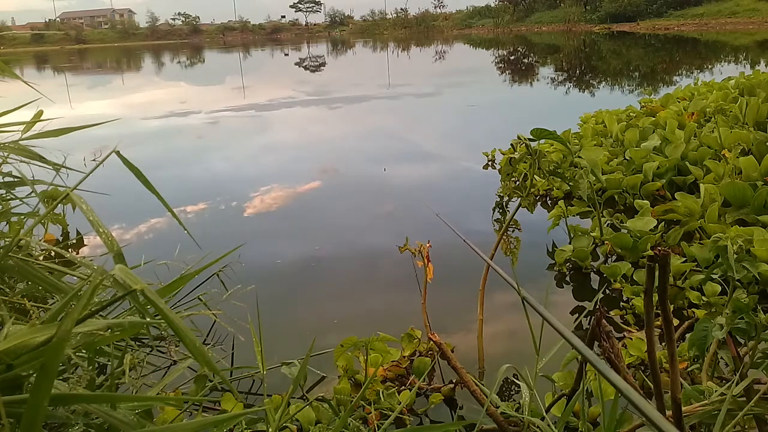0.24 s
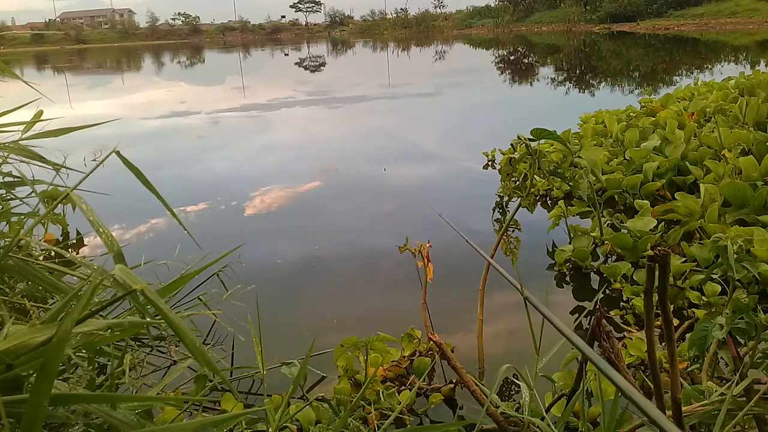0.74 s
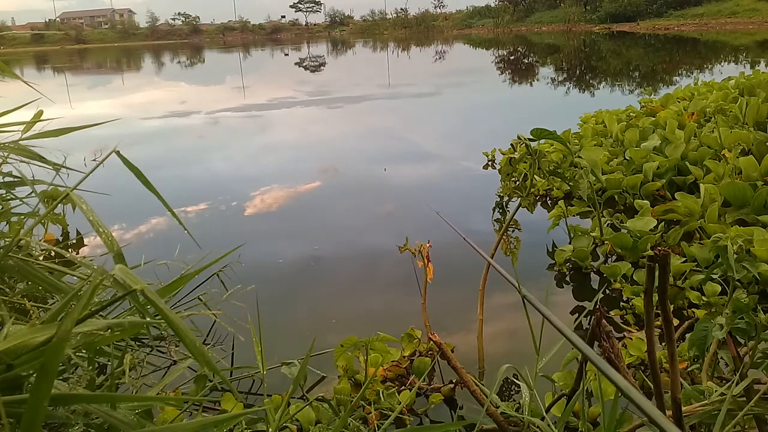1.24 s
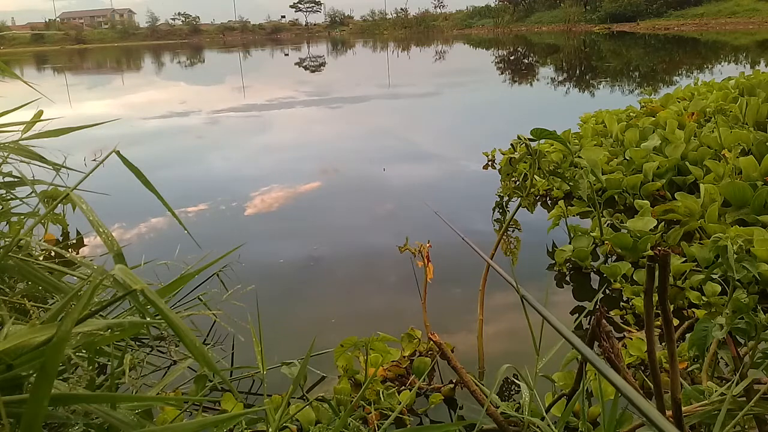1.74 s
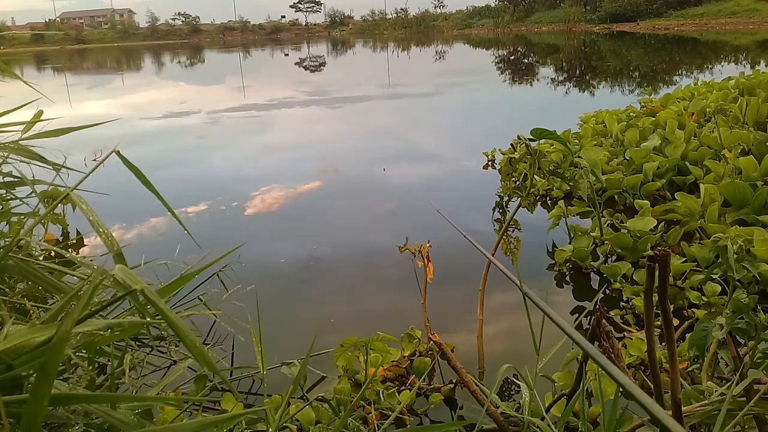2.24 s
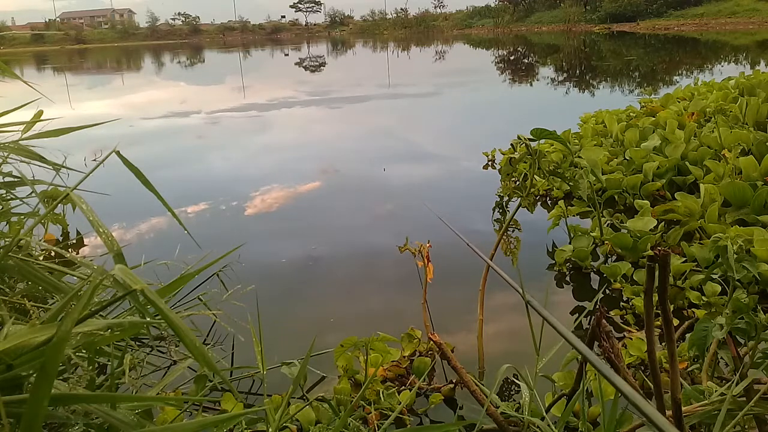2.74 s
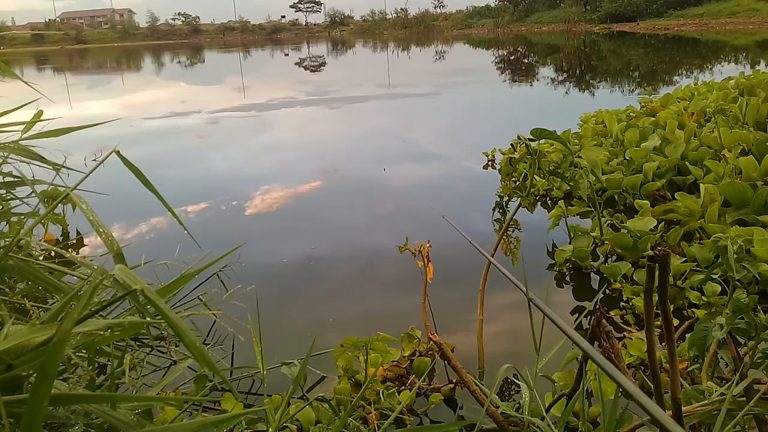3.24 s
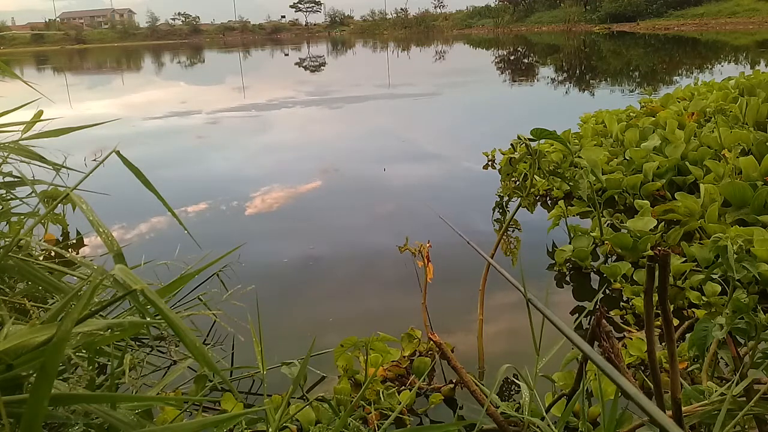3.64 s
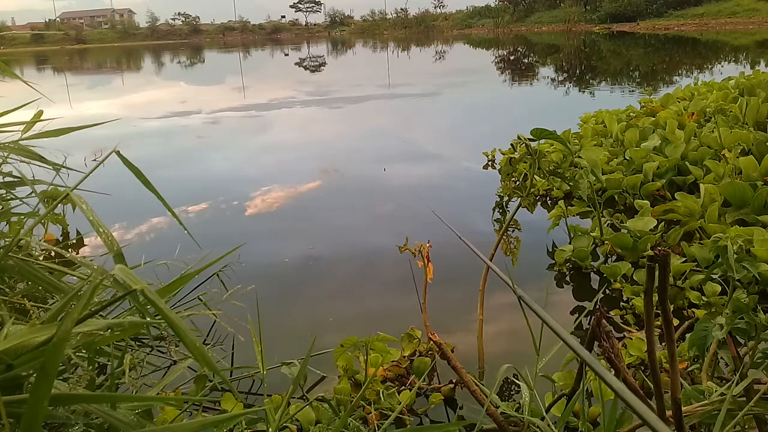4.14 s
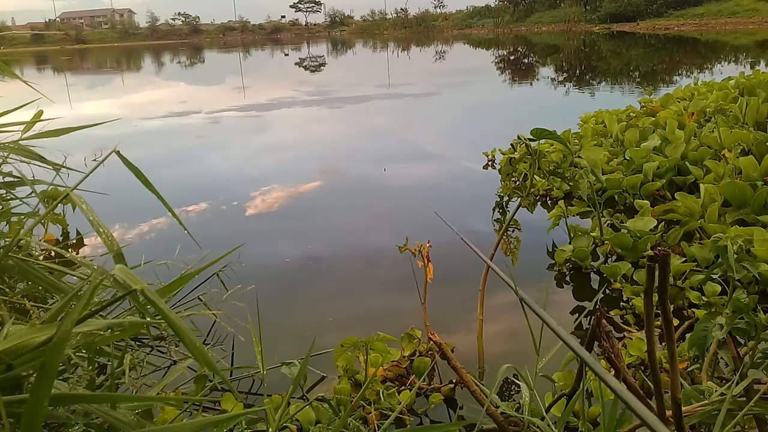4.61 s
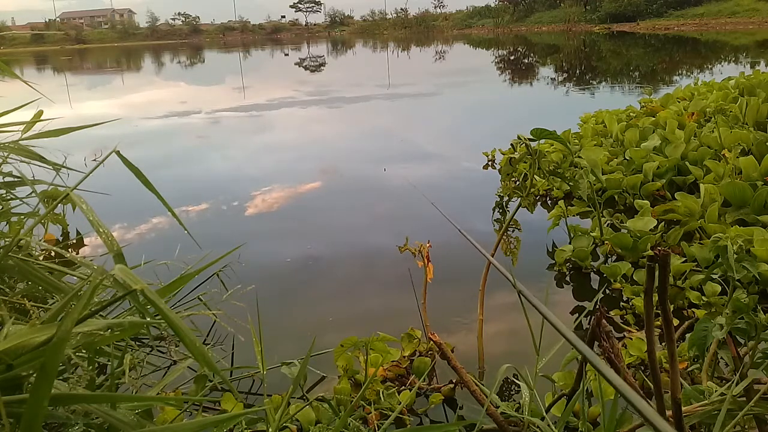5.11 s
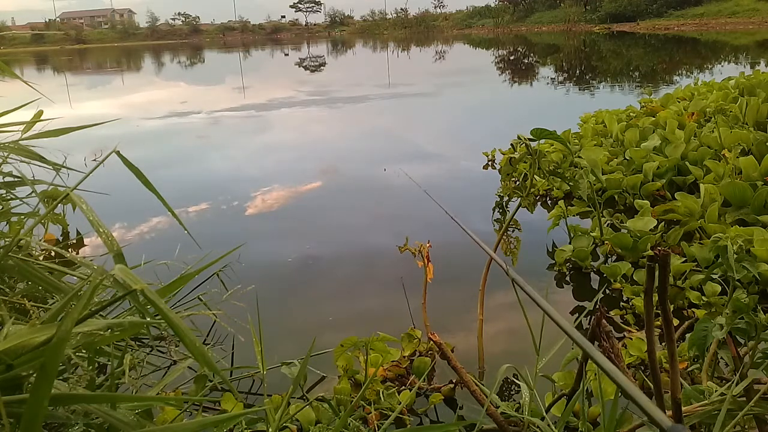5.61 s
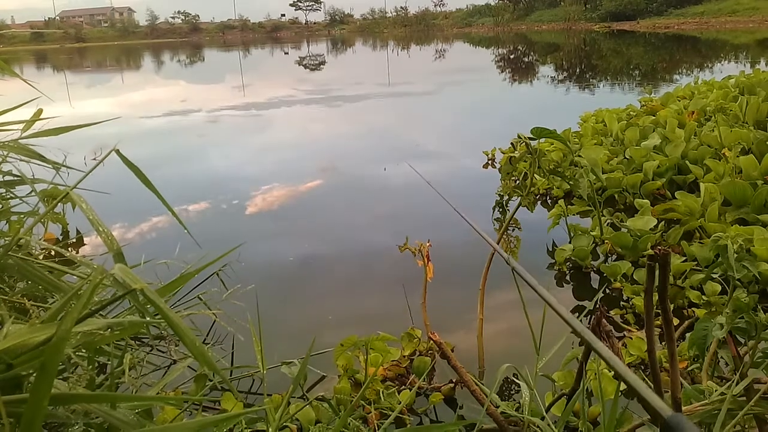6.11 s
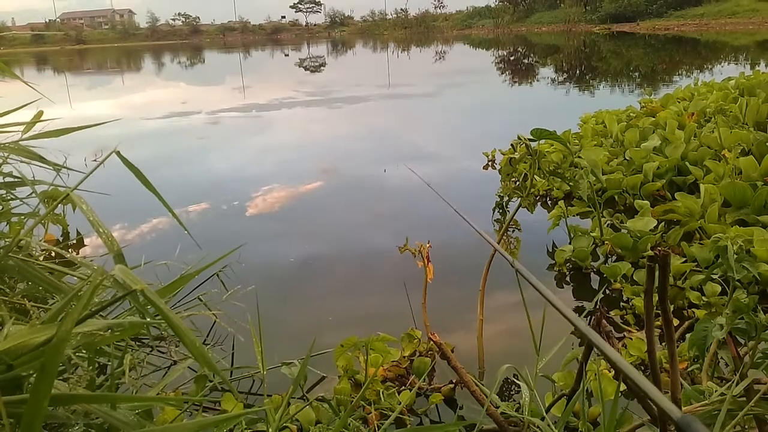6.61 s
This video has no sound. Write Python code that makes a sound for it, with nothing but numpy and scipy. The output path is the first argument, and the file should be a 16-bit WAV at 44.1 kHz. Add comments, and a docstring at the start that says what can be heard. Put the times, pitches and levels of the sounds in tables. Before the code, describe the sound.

A low, steady rumble of a distant town lies under faint cricket trills and small birds chirping beside a pond.

```python
"""Evening on the bank of a pond. From the start a distant town rumbles, a flock twitters across the water
and far crickets trill, their wing strokes driving wing resonances. A cricket in the reeds close by chirps
in short pulse trains; a meadow katydid joins in with a scraping buzz that swells once a second. Small birds
warble and rasp, and faint ticks come from the stems. The near cricket stops before two seconds have passed;
after three, one bird repeats a falling whistle and the warbles grow busier."""
import sys
import numpy as np
from scipy import signal
from scipy.fft import rfft, irfft
from scipy.io import wavfile
from scipy.ndimage import uniform_filter1d

SR = 44100
rng = np.random.default_rng(int(sys.argv[2]) if len(sys.argv) > 2 else 0)


def int16_out(signal):
    """Quantize to a 16-bit WAV file."""
    q = np.round(np.clip(np.atleast_2d(signal).T, -1, 1) * 32767)
    wavfile.write(sys.argv[1], SR, q.astype(np.int16))


N = 302526
TIME = np.arange(N) / SR
BINS = np.maximum(np.fft.rfftfreq(N, 1 / SR), 1)  # Hz


def undb(db):
    """Decibels to amplitude ratio."""
    return 10 ** (np.asarray(db) / 20)


def unit(x):
    """Normalisation to rms 1."""
    return x / np.sqrt(np.mean(x ** 2))


def noise(gain):
    """Spectral shaping: white noise weighted by a gain per frequency bin, at rms 1."""
    return unit(irfft(rfft(rng.standard_normal(N)) * gain, N))


def colour(points):
    """Spectral envelope: gain per bin through (Hz, dB) points on a logarithmic frequency axis."""
    hz, db = np.transpose(points)
    return undb(np.interp(np.log(BINS), np.log(hz), db))


def band(hz, width_hz):
    """Gaussian passband: gain per bin around one frequency."""
    return np.exp(-2 * ((BINS - hz) / width_hz) ** 2)


def ring(x, modes):
    """Forced resonance: x drives parallel (Hz, width in Hz, dB) modes; the response has rms 1."""
    gain = sum(undb(db) / (1 + 2 * ((BINS - hz) / width) ** 2) for hz, width, db in modes)
    return unit(irfft(rfft(x) * gain, N))


def walk(rate_hz):
    """Random modulation: noise of rms 1, low-passed near rate_hz."""
    return noise(np.exp(-(BINS / rate_hz) ** 2))


def hump(start, length):
    """Half-sine envelope from silence to 1 and back."""
    return np.sin(np.pi * np.clip((TIME - start) / length, 0, 1))


def add(track, start, sound):
    """Superposition of a sound on a track, from a start in seconds."""
    i = max(int(start * SR), 0)
    part = sound[:max(N - i, 0)]
    track[i:i + len(part)] += part


def scatter(x, t60, wet_db, spread=0.091):
    """Diffuse reflection: leaves and banks add a decaying tail, partly unlike in the two ears."""
    t = TIME[:SR]
    tails = rng.standard_normal((2, SR)) * undb(-60 * t / t60) * (1 - np.exp(-t / .004))
    mid, side = (signal.fftconvolve(x, tail / np.linalg.norm(tail))[:N] for tail in tails)
    return x + undb(wet_db) * (mid + spread * np.array([side, -side]))


def town(level_db=-44, sway_db=0.85, drone_hz=240, roar_hz=430):
    """Band-wise modulation of noise: the deep rumble sways while engines and tyres follow the traffic."""
    # The town's spectrum. Each row: frequency in Hz, relative spectral density in dB.
    spectrum = [(12, -45), (20, -22.5), (75, -1.5), (140, 0), (198, -6), (368, -23), (503, -28), (573, -35),
                (1000, -44.5), (1300, -60.5), (2200, -120)]
    # Distant traffic. Each row: time in seconds, engine drone gain in dB, tyre roar gain in dB.
    traffic = [(0, -0.5, 2), (1.2, 0, 1), (2.4, 1, 1), (3.3, 1, -2), (4.1, 4, -1), (5, -1, -0.5),
               (6.86, 0.5, -1)]
    low_cut = 1 / (1 + (22 / BINS) ** 6)
    rumble = noise(colour(spectrum) * low_cut)
    upper, roar = (irfft(rfft(rumble) / (1 + (hz / BINS) ** 10), N) for hz in (drone_hz, roar_hz))
    times, *levels = np.transpose(traffic)
    engines, tyres = (undb(np.interp(TIME, times, db)) for db in levels)
    deep = (rumble - upper) * undb(sway_db * walk(0.92))
    return undb(level_db) * (deep + (upper - roar) * engines + roar * tyres)


def air(level_db=-75.5):
    """Incoherent summation: leaves and far insects merge into a faint, wavering wash of noise."""
    # The wash's spectrum. Each row: frequency in Hz, relative spectral density in dB.
    spectrum = [(500, -21), (1100, -2), (1500, -4), (2200, -5.5), (3200, -9.5), (4200, -10.5), (5100, -17),
                (5800, -13.5), (7000, -26.5), (8200, -12.5), (10000, -18), (15000, -18.5)]
    return undb(level_db) * noise(colour(spectrum)) * undb(.5 * walk(6.6))


def far_flock(hz=5000, width_hz=700, level_db=-87.5, patchy_db=2.3):
    """Reverberation runs the twitter of birds on the far bank together into a patchy band of noise."""
    twitter = unit(noise(band(hz, width_hz)) * undb(patchy_db * walk(11.7)))
    return scatter(undb(level_db) * twitter, t60=0.56, wet_db=-14.0)


def far_crickets(stroke_hz=126, scrape=0.74, bright_db=-5):
    """Stridulation: quick strokes ring the wing resonances in soft trills; loud ones add a higher scrape."""
    # Wing resonances. Each row: frequency in Hz, width in Hz, relative gain in dB.
    wings = [(7900, 90, -10), (8144, 87, 6), (8360, 70, -5), (8540, 290, -21)]
    # Bouts of evenly spaced trills. Each row: middle of the first trill in seconds, period in seconds,
    # number of trills, trill length in seconds, level in dB, change per trill in dB.
    bouts = [(0, 0.3, 5, 0.17, -75, 0.5), (1.395, .262, 5, 0.23, -82.5, 0), (2.008, .32, 4, 0.13, -80, 1.7),
             (3.29, .231, 6, 0.24, -84, -0.5), (4.7, .265, 5, 0.15, -81.5, -1.6),
             (5.95, 0.23, 4, 0.19, -83.5, 0)]
    phase = np.cumsum(stroke_hz * (1 + .09 * walk(25) + .06 * walk(90))) / SR
    strokes = np.diff(np.floor(phase), prepend=0)
    grit = np.exp(-(phase % 1)) * rng.standard_normal(N)
    drive = unit(strokes) + scrape * unit(grit)
    effort = sum(undb(db + k * change_db) * hump(first + k * period - length / 2, length)
                 for first, period, count, length, db, change_db in bouts for k in range(count))
    bright = undb(bright_db) * effort / effort.max()
    song = ring(drive, wings) + bright * ring(grit, wings[-1:])
    return scatter(song * effort, t60=.5, wet_db=-9)


def near_cricket(hz=7590, droop_hz=90, stroke_hz=117, stroke_s=0.0076, echo_s=0.0064):
    """Resonant stridulation: each wing stroke is a pure pip, growing louder through the chirp."""
    # Chirps. Each row: time of the first full stroke in seconds, number of full strokes.
    chirps = [(0.0736, 5), (.2077, 6), (0.342, 5), (0.4762, 6), (0.6187, 5), (0.762, 4), (0.8965, 4),
              (1.057, 3), (1.309, 3), (1.427, 4), (1.5606, 5), (1.7113, 3), (1.8632, 1)]
    last_stroke_db, crescendo_db, run_up_db = -50.5, 5.5, -18
    hiss_db, echo_db = -20, -9
    out = np.zeros(N)
    u = np.arange(int(stroke_s * SR)) / (stroke_s * SR)
    shape = np.sin(np.pi * u ** .85) ** 1.6
    for first, count in chirps:
        # stroke -1 is a weak run-up, as the wings engage
        for k, (late, size, detune, phase) in enumerate(rng.standard_normal((count + 1, 4)), start=-1):
            pitch = hz + 25 * detune + droop_hz * (1 - 2 * u)
            rise_db = run_up_db if k < 0 else -crescendo_db * (1 - (k + 1) / count) ** 2
            gain = undb(last_stroke_db + rise_db + 0.5 * size)
            start = first + k / stroke_hz - stroke_s / 2 + 0.00021 * late
            add(out, start, gain * shape * np.sin(2 * np.pi * (np.cumsum(pitch) / SR + phase)))
    # a faint, soft hiss surrounds each chirp's tone
    chirp_envelope = uniform_filter1d(uniform_filter1d(abs(signal.hilbert(out)), size=700), size=600)
    out += undb(hiss_db) * chirp_envelope * noise(band(7250, 540))
    out += undb(echo_db) * np.roll(out, int(echo_s * SR))  # reflection from the water
    return scatter(out, t60=.1, wet_db=-19)


def far_peeps(count=18, low_hz=4720, high_hz=5220, length_s=.06, max_glide_hz=-680, relative_db=-85):
    """Stratified random timing: one faint, falling bird note per time slot, as rows for whistles()."""
    return [((k + when) * TIME[-1] / count, length_s, low_hz + high * (high_hz - low_hz),
             fall * max_glide_hz, relative_db)
            for k, (when, high, fall) in enumerate(rng.random((count, 3)))]


def katydid(stroke_hz=96, first_end_s=0.99, period_s=1.002, length_s=0.64, edge_s=.012):
    """Pulsed friction drives the wing resonances in a buzz that swells and breaks off once a second."""
    # Wing resonances. Each row: frequency in Hz, width in Hz, relative gain in dB.
    wings = [(9350, 560, -5.5), (9900, 190, 0.5)]
    full_db, swell_db = -81.5, 12
    warm_up_db, warm_up_s = -6, 1.5  # early buzzes are weaker, until the insect warms up
    phase = np.cumsum(stroke_hz * (1 + 0.011 * walk(6.7))) / SR
    friction = np.exp(-(phase % 1) / 1.1) * rng.standard_normal(N)
    effort = np.zeros(N)
    for end in np.arange(first_end_s, TIME[-1] + length_s, period_s):
        start = end - length_s
        top_db = full_db + warm_up_db * np.exp((first_end_s - end) / warm_up_s)
        u = np.clip((TIME - start) / length_s, 0, 1)
        gate = np.clip(np.minimum(TIME - start, end - TIME) / edge_s + .5, 0, 1)
        effort += gate * undb(top_db - swell_db * (1 - u) ** 2)
    return scatter(ring(friction, wings) * effort, t60=.35, wet_db=-11)


def whistles(waver=0.012, flutter_db=2.0, gain_db=-2.5, reeds_db=-5, bank_db=-8):
    """Frequency modulation: near-pure arcs of pitch, made uneven by the syrinx and the path over water."""
    # One bird's repeated falling whistle. Each row: start in seconds, relative level in dB.
    slurs = [(3.203, -79), (3.397, -78), (3.53, -79), (3.726, -75), (3.906, -73), (4.075, -76),
             (4.305, -77.5), (4.487, -72.5), (4.67, -75), (5.02, -72.5), (5.197, -75), (5.383, -74),
             (5.61, -74), (6.724, -75)]
    slur_s, slur_hz, slur_glide_hz = .06, 4970, -680
    # The other birds' arched notes. Each row: start in seconds, length in seconds, middle pitch in Hz,
    # glide in Hz, relative level in dB.
    warbles = [(.514, .065, 3300, 70, -76.5), (.99, .042, 2900, -100, -82), (1.157, .04, 3070, 60, -74.5),
               (1.61, .06, 3320, 90, -82.5), (2.72, .07, 3900, -100, -82), (3.204, .08, 4320, -90, -81),
               (3.328, 0.1, 3940, -50, -80), (3.756, 0.09, 4650, -450, -70), (3.807, 0.07, 4270, 40, -72),
               (3.931, .06, 4420, -500, -72), (4.015, .07, 3860, 90, -77), (4.182, .12, 4690, -620, -67.5),
               (4.804, 0.11, 4750, -600, -65), (4.939, 0.087, 4320, -100, -69),
               (5.073, 0.082, 4750, -230, -70.5), (5.113, .075, 3855, 0, -70),
               (5.486, 0.12, 4570, -350, -76.5), (5.598, 0.093, 4340, -170, -73),
               (6.05, 0.082, 3950, -130, -76.5), (6.171, 0.083, 4090, -60, -71.5),
               (6.311, 0.06, 4370, -150, -71), (6.605, 0.067, 3950, 328, -71)]
    arch_hz_per_s = 1200  # both ends of a note sag, the more the longer it lasts
    scoop, scoop_s, long_note_s = .05, .009, .065  # long notes start this fraction flat and slide up
    out, wobble, flutter = np.zeros(N), walk(240), walk(77)
    slur_notes = [(start, slur_s, slur_hz, slur_glide_hz, db) for start, db in slurs]
    for start, length, hz, glide_hz, db in slur_notes + warbles + far_peeps():
        u = np.linspace(0, 1, int(length * SR))
        here = (int(start * SR) + np.arange(len(u))) % N
        pitch = hz + glide_hz * (u - .5) - arch_hz_per_s * length * (2 * u - 1) ** 2
        pitch *= 1 + waver * wobble[here] - scoop * (length > long_note_s) * np.exp(-u * length / scoop_s)
        shape = np.sqrt(np.abs(np.sin(np.pi * u))) * undb(db + gain_db + flutter_db * flutter[here])
        add(out, start, np.sqrt(2) * shape * np.sin(2 * np.pi * np.cumsum(pitch) / SR))
    # nearby reeds blur each note; the far bank answers faintly
    blurred = scatter(out, t60=0.071, wet_db=reeds_db, spread=0)[0]
    return scatter(blurred, t60=0.69, wet_db=bank_db)


def ticks(decay_s=0.0067):
    """Damped transients: tiny dry snaps among the stems, as noise that dies away exponentially."""
    # Snaps. Each row: start in seconds, initial level in dB.
    snaps = [(.5183, -73), (.5822, -73), (1.4522, -78), (1.558, -78), (5.241, -69), (6.2792, -76)]
    envelope = sum(undb(db) * (TIME > start) * np.exp(-abs(TIME - start) / decay_s) for start, db in snaps)
    return envelope * noise(band(5400, 1800))


def rasps():
    """Source and filter: a rough source in one resonance of a bird's throat gives a hoarse chip."""
    # Chips. Each row: start in seconds, length in seconds, centre in Hz, width in Hz, level in dB.
    chips = [(1.13, .04, 2350, 450, -77.5), (1.162, .05, 3040, 380, -78), (3.73, 0.11, 5160, 1300, -77),
             (3.694, .11, 4030, 300, -77), (4.077, 0.08, 1360, 130, -78), (4.243, .03, 2600, 250, -78),
             (4.252, 0.063, 2990, 220, -72.5), (5.926, 0.049, 5330, 750, -65.5),
             (5.932, 0.038, 3620, 220, -69.5), (6.158, 0.16, 4900, 450, -75), (6.32, .12, 5000, 1200, -78),
             (6.622, .035, 4700, 1200, -74)]
    out = sum(undb(db) * hump(start, length) * noise(band(hz, width))
              for start, length, hz, width, db in chips)
    return scatter(out, t60=.5, wet_db=-10)


def scene():
    """Superposition: all the sources lie ahead, and only their scattered returns have width."""
    insects = near_cricket() + far_crickets() + katydid()
    birds = whistles() + rasps() + far_flock()
    return insects + birds + ticks() + town() + air()


def record(dry, hiss_db=-77, cutoff_hz=15850):
    """Self-noise and band limiting: each microphone adds its own hiss, and the top is cut steeply."""
    # Microphone hiss. Each row: frequency in Hz, relative spectral density in dB.
    spectrum = [(200, -27), (1000, -26.5), (2500, -5), (7000, 1.5), (11000, 1), (15000, 2)]
    hiss = undb(hiss_db) * np.array([noise(colour(spectrum)) for _ in dry])
    low_pass = 1 / (1 + (BINS / cutoff_hz) ** 200)
    return irfft(rfft(dry + hiss) * low_pass, N)


dry = scene()
out = record(dry)
int16_out(out)
```